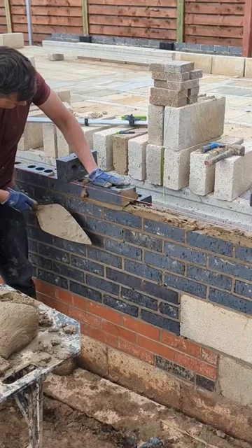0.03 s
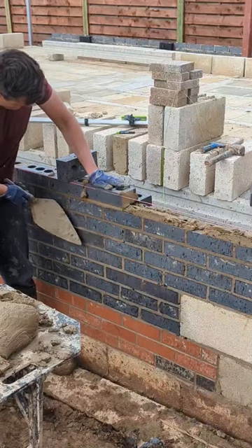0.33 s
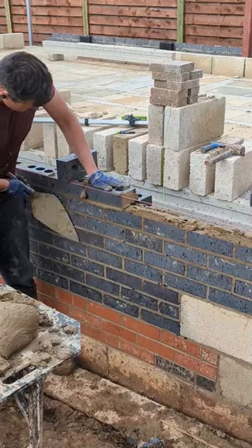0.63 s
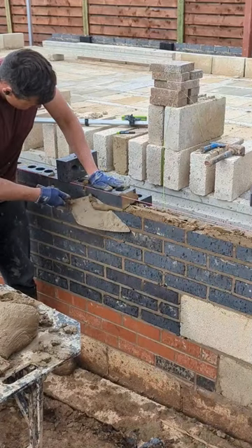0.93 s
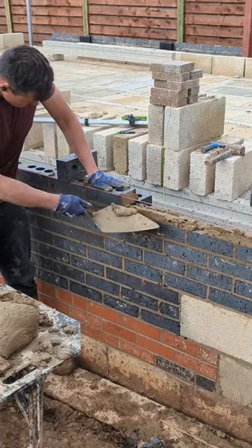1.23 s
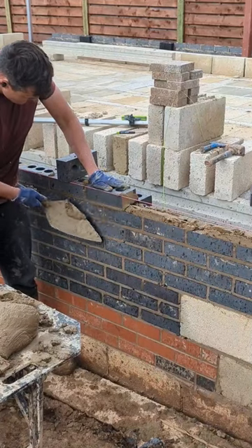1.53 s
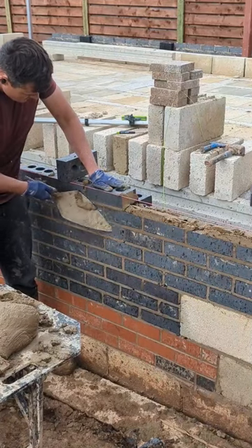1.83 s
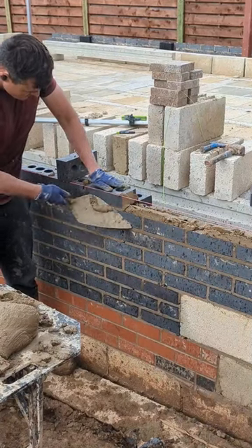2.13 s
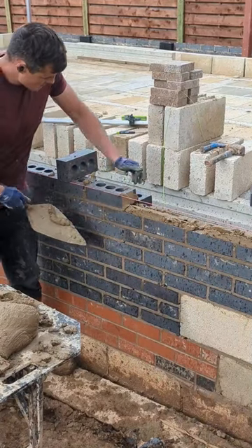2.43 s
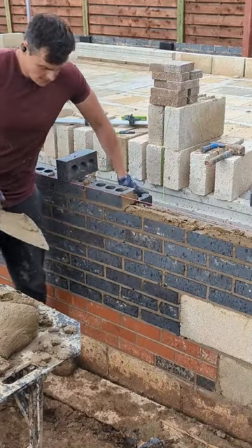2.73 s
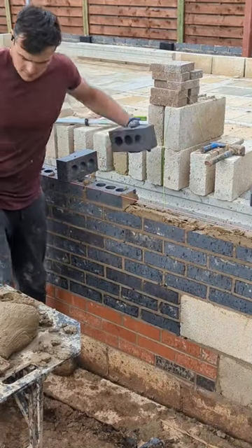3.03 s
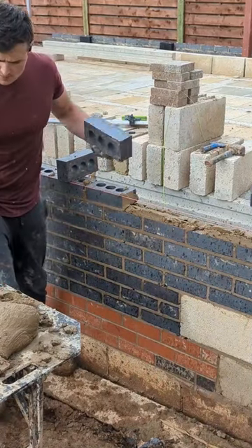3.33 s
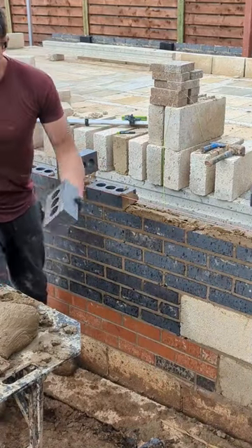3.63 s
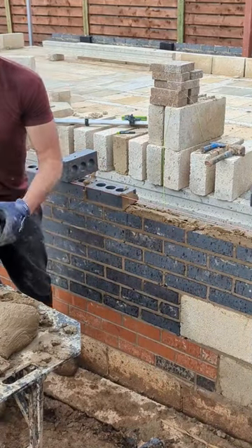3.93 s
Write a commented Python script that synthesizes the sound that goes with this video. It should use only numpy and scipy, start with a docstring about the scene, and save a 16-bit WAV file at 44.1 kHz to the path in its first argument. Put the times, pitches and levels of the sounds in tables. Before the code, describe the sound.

Three sandy, rasping scrapes of a trowel on brick come with small grit snaps and a slight ring of the blade, then soft brick handling. Light wind buffets the microphone at an outdoor building site with far traffic.

```python
"""A steel trowel scrapes spare mortar off a brick joint in three strokes; then a brick is lifted.
Sand grains catch and slip under the edge, hissing and ringing the flexing blade. Coarse grains snap,
loose ones trickle, and light scuffs fall between the strokes, all with a faint outdoor echo.
Wind rumbles and buffets on the microphone. Far off: traffic, a whining machine, three bird chirps."""
import sys
import numpy as np
from scipy import signal
from scipy.fft import rfft, irfft
from scipy.io import wavfile
from scipy.ndimage import uniform_filter1d, map_coordinates

SR = 44100
rng = np.random.default_rng(int(sys.argv[2]) if len(sys.argv) > 2 else 0)


def generate_wav(signal):
    """Clip the signal to [-1, 1] and save it as 16-bit WAV at the path in sys.argv[1]."""
    frames = np.transpose(np.atleast_2d(signal))
    scaled = np.clip(frames, -1, 1) * 32767
    pcm = np.round(scaled).astype(np.int16)
    wavfile.write(sys.argv[1], SR, pcm)


N = 176400

# far traffic spectrum: freq_hz, gain_db
TRAFFIC_SPECTRUM = [(60,12),(150,-16),(250,-2),(480,4),(700,2),(900,1.5),(1080,3),(1300,0),(1600,-6),(2100,-9),(2700,-11),(3600,-19),(4800,-23.5),(6000,-34),(9000,-52.5),(12500,-54),(15500,-54)]
# machine's steady low hum and other tones: pitch_hz, level_db, waver_ratio
MACHINE_TONES = [(100.6,-46.5,0.0053),(183.5,-57.5,0.00975),(292,-63.5,0.0014),(344.3,-58.5,0.0015),(1058.5,-60.5,0.0021),(1179,-57,0.0013),(1190,-63.5,0.002)]
# machine's whine near 1 kHz, swelling and fading: time_s, level_db
WHINE_ENVELOPE = [(.8,-55.5),(1.0,-47),(1.8,-53),(2.3,-47.5),(2.6,-54),(3.1,-60),(3.3,-52),(3.85,-49.5)]
# bird chirps: centre_s, length_s, pitch_hz, level_db
BIRD_CHIRPS = [(2.596,0.03,2890,-53),(2.726,0.033,2980,-51),(3.885,0.032,2850,-52)]
# wind spectra: freq_hz, gain_db
RUMBLE_SPECTRUM = [(8,1.5),(18,2),(32,-1),(60,-2),(85,-9),(130,-19),(200,-24.5),(300,-37.5),(600,-50)]
BLUSTER_SPECTRUM = [(30,-15.5),(80,-17),(130,13),(200,8.5),(300,-6.5),(450,-10),(800,-44)]
# gusts: centre_s, half_width_s, rumble_db, bluster_db
WIND_GUSTS = [(.22,0.015,-24,-35),(0.314,0.049,-24,-34),(0.438,0.023,-24.5,-40),(1.212,0.022,-20.5,-36.5),(1.386,0.031,-28.5,-37),(1.47,0.043,-26.5,-50),
              (1.73,0.029,-26,-49),(1.86,0.11,-23.5,-40.5),(1.93,0.019,-17.5,-56),(2.035,0.079,-22,-62),(2.65,0.022,-29,-59)]
# single eddies: centre_s, width_s, gain_db
WIND_BUFFETS = [(0.2787,0.00085,-12.5),(0.2859,0.00066,-13),(0.293,0.0077,-10.5),(0.338,0.00086,-20),(0.436,0.00077,-32),(1.228,0.0041,-13.5),
                (1.355,0.00095,-21),(1.381,0.00084,-11),(1.395,0.00066,-18.5),(1.733,0.0014,-29),(3.39,0.0012,-21.5)]
# touches of steel, glove and brick: start_s, length_s, hiss_db, rasp_db
SCUFF_EVENTS = [(0.342,0.0092,-71,-51),(0.785,0.022,-66,-51.5),(0.845,0.0091,-47.5,-51.5),(1.375,0.021,-69,-49),(1.518,0.1,-72.5,-55.5),(1.63,0.06,-72,-50),
                (1.71,0.024,-53,-42),(1.736,0.074,-68,-50.5),(1.838,0.0088,-58,-55),(2.463,0.15,-71,-54),(2.686,0.052,-72,-56),
                (3.171,0.016,-70,-52),(3.206,0.06,-63.5,-49.5),(3.372,0.034,-50.5,-54),(3.405,0.042,-74,-74),(3.786,0.016,-67,-47),(3.8,0.086,-73,-61)]
# spectra of brief gritty contacts: freq_hz, gain_db
TOUCH_HISS_SPECTRUM = [(2000,-6),(4000,3.5),(6000,4.5),(9000,1),(12300,-0.5),(13500,-7),(15500,-18.5)]
TOUCH_RASP_SPECTRUM = [(400,14.5),(1100,15),(2000,15.5),(3200,9),(5000,-1),(8000,-71)]
# coarse grains bursting: start_s, gain_db
GRAIN_SNAPS = [(0.847,-46.5),(1.0631,-25),(1.185,-37),(2.064,-35),(2.087,-31.5),(2.327,-32),(2.382,-34),(2.454,-37.5),(2.492,-51),(3.381,-45),(3.384,-47),(3.401,-48),(3.405,-48)]
# blade rasp and sand hiss, one list per stroke: time_s, rasp_gain_db, hiss_gain_db
STROKE_ENVELOPES = [
    [(.876,-58,-50.5),(.93,-41,-54),(.991,-30,-32.5),(1.03,-31,-35.5),(1.06,-25.5,-27),(1.075,-31.5,-33.5),(1.093,-30,-28),(1.16,-34,-42),(1.183,-34,-42),(1.238,-45.5,-44),(1.265,-75,-67)],
    [(1.908,-46,-60),(1.932,-35.5,-46),(1.99,-34.5,-44),(2.03,-32,-36.5),(2.062,-27,-35.5),(2.092,-33,-33.5),(2.116,-37.5,-47),(2.135,-34.5,-41),(2.212,-48,-59)],
    [(2.23,-48.5,-55),(2.275,-41,-44),(2.322,-32.5,-33),(2.338,-38,-36.5),(2.393,-30.5,-34.5),(2.43,-37.5,-43),(2.456,-36.5,-40.5),(2.472,-52,-66)],
]
# blade resonances, one list per stroke as the pressure differs: freq_hz, width_hz, gain_db
BLADE_MODES = [
    [(626,70,1),(1230,190,7.5),(1660,84,1.5),(2260,55,3.5),(2492,46,7.5),(2790,53,6),(3174,45,5),(3390,74,0.5),(3830,28,1),(4490,92,-1.5),(6780,50,-4),(8715,53,-2)],
    [(1200,100,9.5),(1640,52,0.5),(1900,98,-2.5),(2680,140,0),(3150,180,-2),(3580,42,-7),(5020,160,-4.5),(6620,110,-16)],
    [(736,39,-3),(1170,125,7.5),(1920,130,0),(2430,190,-2.5),(3380,69,-3),(4640,75,-12),(5800,90,-10)],
]
# stroke spectra: freq_hz, gain_db
BLADE_RASP_SPECTRUM = [(200,-40),(420,-12),(750,3.5),(880,-6.5),(1150,1.5),(2000,3.5),(3300,-4),(4500,-11),(8000,-80)]
SAND_HISS_SPECTRUM = [(1500,-19),(3200,-27),(4500,1.5),(6500,3.5),(7500,-0.5),(8800,3),(11000,-0.5),(13000,-11.5),(14000,-29),(15500,-54)]

DARKEN_DB = [17, 3.5, 3.5]  # per stroke: lows rise and highs fall by this much


def undb(db):
    return 10 ** (np.asarray(db) / 20)


def unit_rms(x):
    return x / np.sqrt(np.mean(x ** 2))


def times():
    return np.arange(N) / SR


def freqs():
    return np.maximum(np.arange(N // 2 + 1) * SR / N, 1)


def colour(x, spectrum):
    """Shape x by (freq_hz, gain_db) points, falling steeply above the last; rms 1."""
    hz, db = np.array(spectrum).T
    f = freqs()
    gain = undb(np.interp(np.log(f), np.log(hz), db))
    rolloff = np.minimum(hz[-1] / f, 1) ** 4
    return unit_rms(irfft(rfft(x) * gain * rolloff, N))


def drift(rate_hz):
    """Smooth random curve; rms 1."""
    steps = rng.standard_normal(N // 20)
    return unit_rms(map_coordinates(steps, [times() * rate_hz], order=2, mode="wrap"))


def flicker(depth_db, rate_hz):
    """Random gain around 1."""
    return undb(depth_db * drift(rate_hz))


def traffic(level_db=-45.5):
    """Steady noise of far traffic."""
    return undb(level_db) * colour(rng.standard_normal(N), TRAFFIC_SPECTRUM)


def machine_tone(pitch_hz, level_db, waver_ratio):
    """One tone, wavering in pitch and level."""
    phase = 2 * np.pi * np.cumsum(pitch_hz * (1 + waver_ratio * drift(rate_hz=12))) / SR
    return np.sqrt(2) * undb(level_db) * flicker(depth_db=1.8, rate_hz=9) * np.sin(phase)


def machine():
    """Distant hum and other tones; a whine near 1 kHz swells and fades."""
    whine_db = np.interp(times(), *np.array(WHINE_ENVELOPE).T)
    whine = machine_tone(pitch_hz=1027, level_db=whine_db, waver_ratio=.0012)
    return whine + sum(machine_tone(*row) for row in MACHINE_TONES)


def bird(waver_ratio=0.065):
    """Faint far chirps, blurred by fast pitch jitter."""
    t, out = times(), np.zeros(N)
    warped_s = np.cumsum(1 + waver_ratio * drift(rate_hz=300)) / SR
    for centre_s, length_s, pitch_hz, level_db in BIRD_CHIRPS:
        envelope = np.exp(-(2 * (t - centre_s) / length_s) ** 2)
        out += undb(level_db) * envelope * np.sin(2 * np.pi * pitch_hz * warped_s)
    return out


def wind(steady_db=-32):
    """Rumble on the microphone; gusts swell it and bluster, single eddies thump."""
    t = times()
    rumble_power, bluster_power = undb(steady_db) ** 2, 0
    for centre_s, half_width_s, rumble_db, bluster_db in WIND_GUSTS:
        swell = np.exp(-((t - centre_s) / half_width_s) ** 2)
        rumble_power += swell * undb(rumble_db) ** 2
        bluster_power += swell * undb(bluster_db) ** 2
    rumble = np.sqrt(rumble_power) * colour(rng.standard_normal(N), RUMBLE_SPECTRUM)
    bluster = np.sqrt(bluster_power) * colour(rng.standard_normal(N), BLUSTER_SPECTRUM)
    out = (rumble + bluster) * flicker(depth_db=0.9, rate_hz=11)
    for centre_s, width_s, gain_db in WIND_BUFFETS:
        u = (t - centre_s) / width_s
        pulse = np.exp(-u ** 2 / 2) - np.exp(-(u / 4) ** 2 / 2) / 4  # zero mean
        out += undb(gain_db) * pulse
    return out


def yard_echo(x, t60_s=0.27, echo_db=-21.5, delay_s=0.011):
    """x plus a short echo from walls and fence."""
    t = times()[:SR]
    tail = rng.standard_normal(SR) * (t > delay_s) * np.exp(-np.log(1000) * t / t60_s)
    tail /= np.sqrt(np.sum(tail ** 2))
    return x + undb(echo_db) * signal.fftconvolve(x, tail)[:N]


def steel_smear(x, decay_s=0.0057, shifts_per_s=19):
    """The blade's dense high modes smear each grain, shifting as the contact slides."""
    t, out = times(), np.zeros(N)
    lag_s = t[:SR // 25]
    position = t * shifts_per_s
    tails = rng.standard_normal((256, len(lag_s))) * np.exp(-lag_s / decay_s)
    for k, tail in enumerate(tails):
        start, end = np.searchsorted(position, [k - 1, k + 1])
        if end > start:
            crossfade = np.cos(np.pi / 2 * (position[start:end] - k))
            part = signal.fftconvolve(x[start:end] * crossfade, tail)[:N - start]
            out[start:start + len(part)] += part
    return out


def crumbs(grains_per_s=830, level_db=-78.5, spread_db=0.5):
    """Loose mortar trickles over the bricks."""
    falls = rng.random(N) < grains_per_s / SR
    size = undb(-spread_db * np.minimum(rng.exponential(size=N), 3))
    return undb(level_db) * colour(steel_smear(falls * size), TOUCH_HISS_SPECTRUM)


def grit(grains_per_s=11000, spread_db=4, crack_db=-6):
    """Unequal sand grains crack under a steel edge that catches and chatters."""
    hits = rng.random(N) < grains_per_s / SR
    size = undb(spread_db * np.minimum(rng.exponential(size=N), 4))
    catch = flicker(depth_db=1.22, rate_hz=87)
    chatter = flicker(depth_db=1.4, rate_hz=600)
    grains = unit_rms(hits * size * rng.standard_normal(N))
    return catch * chatter * (unit_rms(steel_smear(grains)) + undb(crack_db) * grains)


def scuffs(attack_ratio=0.34, release_s=0.0079):
    """Light gritty touches: attack, hold, release."""
    t, sand, out = times(), grit(), np.zeros(N)
    hiss, rasp = colour(sand, TOUCH_HISS_SPECTRUM), colour(sand, TOUCH_RASP_SPECTRUM)
    for start_s, length_s, hiss_db, rasp_db in SCUFF_EVENTS:
        attack = np.clip((t - start_s) / (attack_ratio * length_s), 0, 1)
        release = np.exp(-np.maximum(t - start_s - length_s, 0) / release_s)
        out += attack * release * (undb(hiss_db) * hiss + undb(rasp_db) * rasp)
    return out


def snaps(decay_s=.003, body_db=-4):
    """Coarse grains burst under the trowel or the lifted brick."""
    t, noise = times(), rng.standard_normal(N)
    crack = colour(noise, TOUCH_HISS_SPECTRUM)
    body = undb(body_db) * colour(noise, TOUCH_RASP_SPECTRUM)
    envelope = sum(undb(gain_db) * (t > start_s) * np.exp(-np.abs(t - start_s) / decay_s)
                   for start_s, gain_db in GRAIN_SNAPS)
    return (crack + body) * envelope


def blade_ring(x, modes, bend_ratio=.004):
    """Sliding contact favours one mode, then another; flexing bends their pitch. Rms 1."""
    f, drive, ring = freqs(), rfft(x), np.zeros(N)
    for freq_hz, width_hz, gain_db in modes:
        mode = irfft(drive / (1 + 1j * (f * f - freq_hz * freq_hz) / (f * width_hz)), N)
        ring += undb(gain_db) * flicker(depth_db=2, rate_hz=16) * mode
    bent_index = np.cumsum(1 + bend_ratio * drift(rate_hz=14))
    return unit_rms(map_coordinates(ring, [bent_index], order=3, mode="mirror"))


def trowel_stroke(envelope, modes, darken_db, split_hz=1880, rasp_trim_db=-3, hiss_trim_db=-1):
    """One pass: grit hisses and rings the blade; the rasp darkens as mortar loads it."""
    t = times()
    time_s, rasp_db, hiss_db = np.array(envelope).T
    contact = uniform_filter1d(1. * ((t > time_s[0]) & (t < time_s[-1])), size=200)
    sand = grit()
    blade = colour(sand, BLADE_RASP_SPECTRUM) + blade_ring(grit(), modes)
    lows = irfft(rfft(blade) / (1 + (freqs() / split_hz) ** 4), N)
    tilt = undb(darken_db * np.interp(t, [time_s[0], time_s[-1]], [-.5, .5]))
    darkened = lows * tilt + (blade - lows) / tilt
    crunch = flicker(depth_db=0.9, rate_hz=110)  # mortar clots load and release the blade
    rasp = crunch * darkened * undb(rasp_trim_db + np.interp(t, time_s, rasp_db))
    hiss = colour(sand, SAND_HISS_SPECTRUM) * undb(hiss_trim_db + np.interp(t, time_s, hiss_db))
    return contact * (rasp + hiss)


def scene():
    """Trowel work with its echo, over the outdoor background; mono."""
    strokes = sum(trowel_stroke(*row) for row in zip(STROKE_ENVELOPES, BLADE_MODES, DARKEN_DB))
    work = strokes + scuffs() + snaps() + crumbs()
    return (yard_echo(work) + wind() + traffic() + machine() + bird())[None]


def record(dry, start_s=0.1316, fade_s=0.0093, cutoff_hz=15480):
    """Brief opening silence, short fades in and out, steep low-pass."""
    t = times()
    fades = np.clip(np.minimum(t - start_s, t[-1] - t) / fade_s, 0, 1)
    lowpass = signal.ellip(10, .2, 80, cutoff_hz, fs=SR, output="sos")
    return signal.sosfilt(lowpass, dry * fades)


dry = scene()
out = record(dry)
generate_wav(out)
```